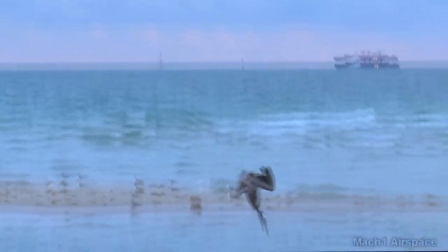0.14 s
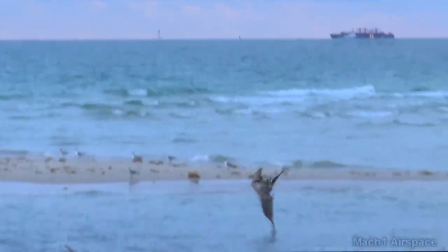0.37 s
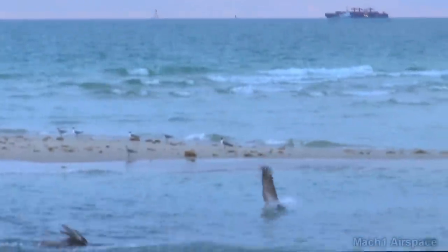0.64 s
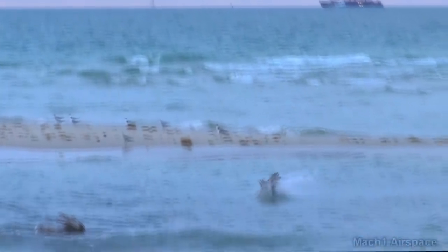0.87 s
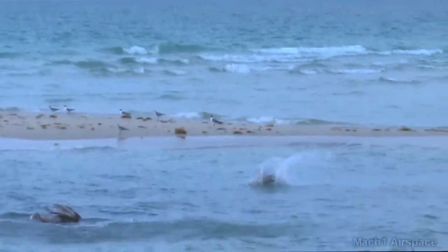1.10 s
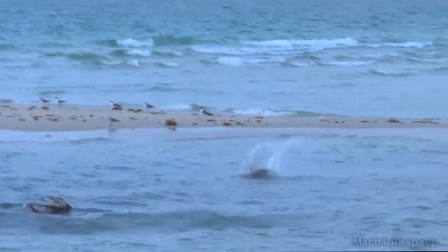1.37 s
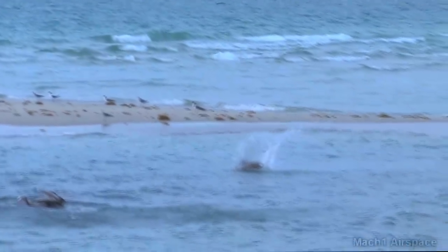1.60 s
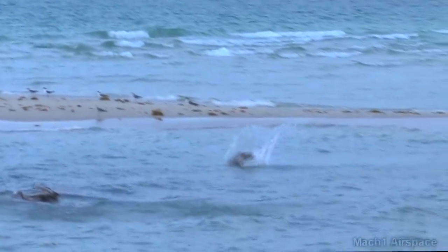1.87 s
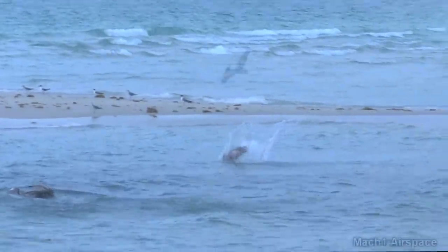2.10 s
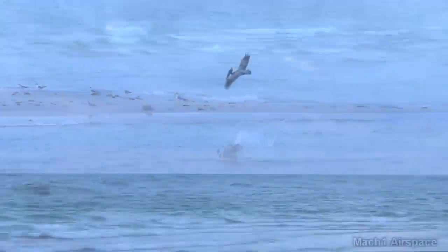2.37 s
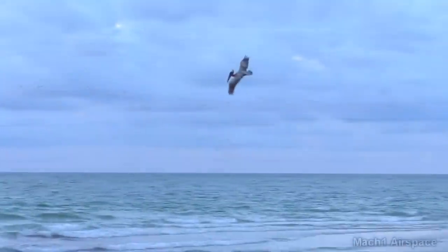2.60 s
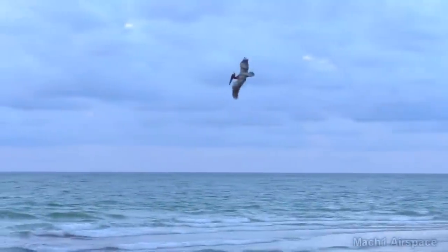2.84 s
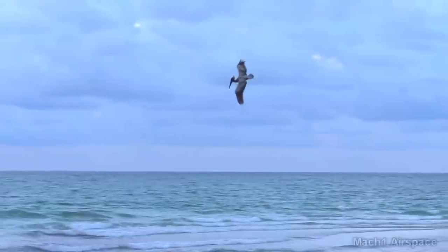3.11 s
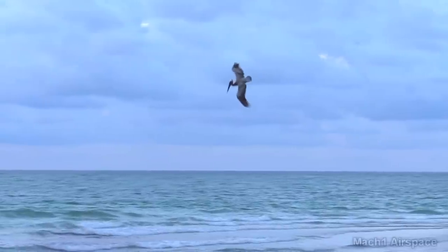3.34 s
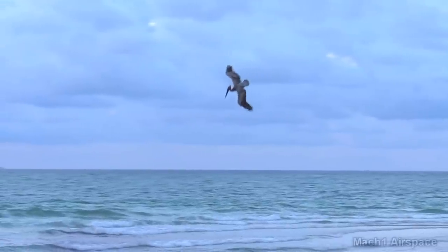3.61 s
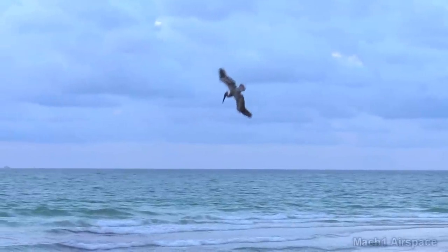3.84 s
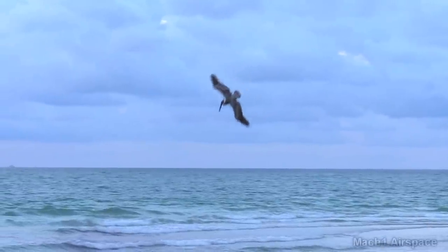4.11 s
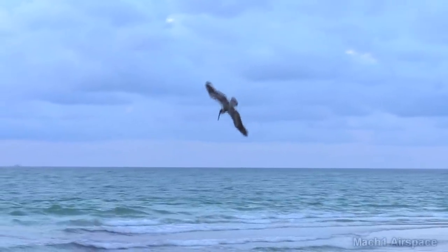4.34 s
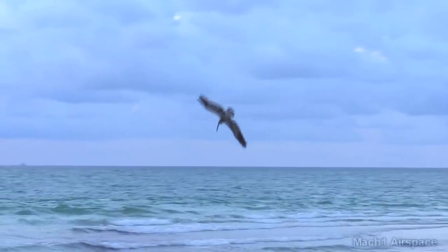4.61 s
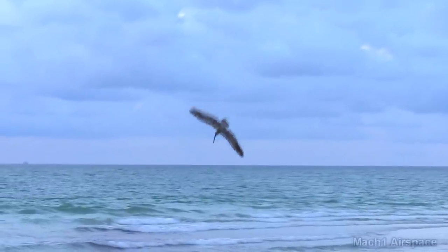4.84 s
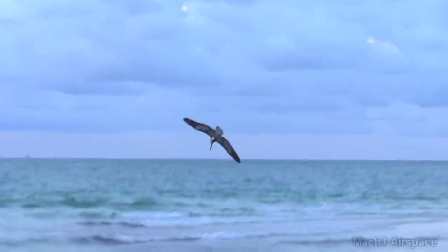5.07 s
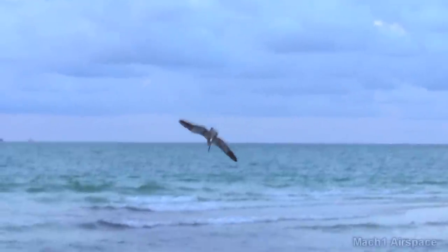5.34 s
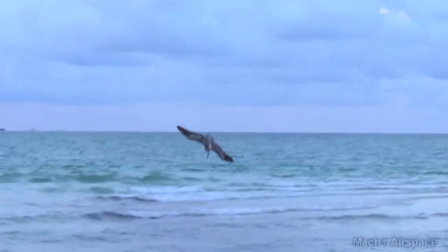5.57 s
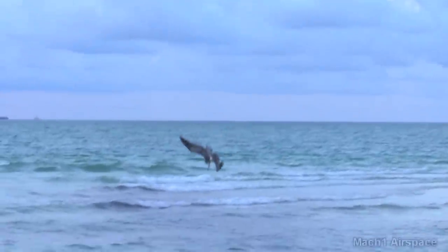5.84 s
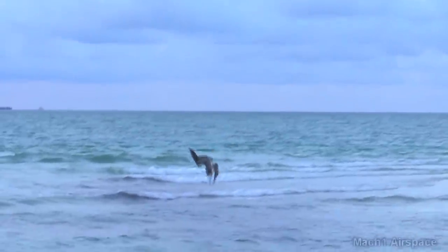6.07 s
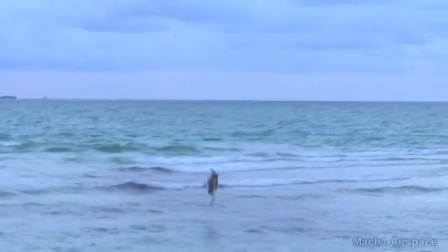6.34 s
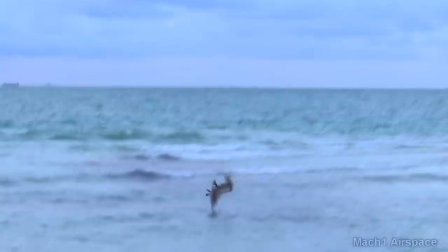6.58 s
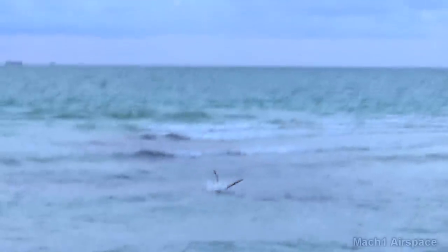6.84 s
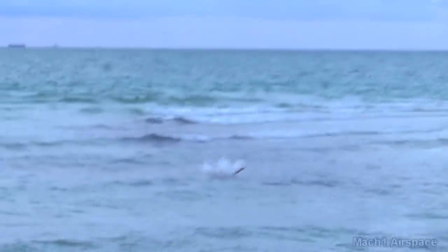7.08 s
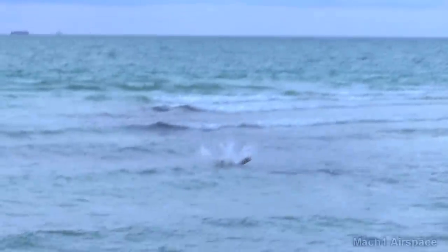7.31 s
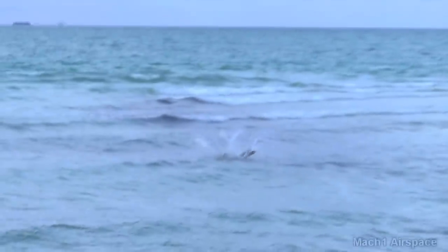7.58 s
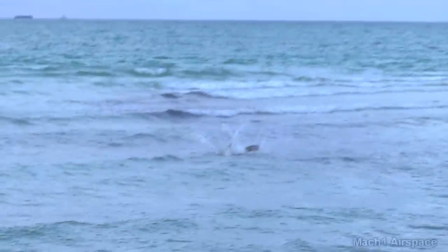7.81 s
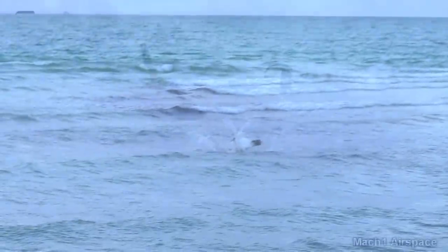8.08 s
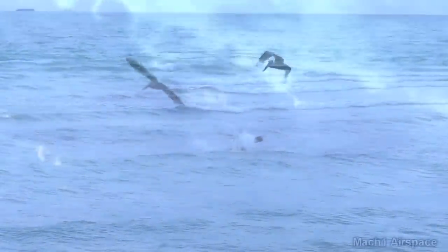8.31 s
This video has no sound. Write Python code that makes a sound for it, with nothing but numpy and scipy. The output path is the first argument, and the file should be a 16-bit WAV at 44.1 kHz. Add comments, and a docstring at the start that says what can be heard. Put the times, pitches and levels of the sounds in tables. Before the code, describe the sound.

Surf washes and hisses on a beach under buffeting microphone wind, then a gull gives seven short falling cries and a shorebird whistles thinly.

```python
"""Surf, wind and shorebirds

Surf washes onto a beach: filtered noise whose spectrum follows the swell, foam and far breakers.
Wind buffets a small stereo microphone and overloads it in the gusts: infrasonic noise and hard shoves.
Towards the end a gull gives a row of short falling cries, each a gliding stack of harmonics,
and a small shorebird a thin long whistle, a wavering near sine."""
import sys
import numpy as np
from scipy import signal
from scipy.fft import rfft, irfft
from scipy.io import wavfile
from scipy.ndimage import uniform_filter1d

SR = 44100
rng = np.random.default_rng(int(sys.argv[2]) if len(sys.argv) > 2 else 0)


def digitize_waveform(pressure):
    """Quantize a signal to 16-bit integers and store it at the path in sys.argv[1].

    Rows of a 2-D input are taken as channels; values are limited to [-1, 1].
    """
    field = np.atleast_2d(pressure).T
    bounded = np.clip(field, -1, 1)
    quanta = np.round(bounded * 32767).astype(np.int16)
    wavfile.write(sys.argv[1], SR, quanta)


def amplitude_ratio(level_db):
    """Convert a level in decibels to the matching linear amplitude (field) ratio."""
    exponent = np.asarray(level_db, float) / 20
    return 10 ** exponent


N = 372204  # samples


def evened(x):
    """Normalisation: scales to rms 1."""
    return x / np.sqrt(np.mean(x ** 2) + 1e-20)


def read(points, hz):
    """Interpolation of a spectrum table on a logarithmic frequency axis."""
    f, value = np.transpose(points)
    return np.interp(np.log(hz + 1), np.log(f + 1), value)


def add(mix, start_s, sound):
    """Superposition: adds a sound into the mix from start_s on."""
    part = mix[round(start_s * SR):][:len(sound)]
    part += sound[:len(part)]


def band_noise(low_hz, high_hz, channels=1):
    """Spectral shaping: noise with a soft lower and a steep upper edge, rms 1."""
    hz = np.fft.rfftfreq(N, 1 / SR) + 1e-6
    shape = 1 / np.sqrt((1 + (low_hz / hz) ** 4) * (1 + (hz / high_hz) ** 6))
    spectrum = rfft(rng.standard_normal((channels, N))) * shape
    return evened(irfft(spectrum, N))


def smoothed_field(field, bins, frames):
    """Correlation length: averages a random field over frequency bins and time frames, rms 1."""
    return evened(uniform_filter1d(uniform_filter1d(field, size=bins, axis=0), size=frames, axis=1))


# Relative spectral density of the surf [f/Hz, level/dB per Hz]
SURF_DENSITY = [(12, -34), (21, 2.5), (60, 1), (102, -5.5), (239, -3), (307, -13), (348, -10), (482, -16.5),
                (796, -13.5), (1130, -17), (1570, -23.5), (2020, -24), (2450, -27.5), (2950, -28.5),
                (3250, -31.5), (3870, -35), (5930, -40), (11500, -51), (13000, -60)]
# Likeness of left and right in the surf [f/Hz, likeness 0-1]
STEREO_LIKENESS = [(60, 0.96), (130, 1), (280, 0.96), (590, 0.93), (1270, 0.77), (2710, 0.44), (5820, 0.7),
                   (8500, 0.66), (12500, 0.77)]
# Tilt of the surf between the sides [f/Hz, left over right/dB]
STEREO_LEAN = [(60, 1.5), (170, 1), (510, 1.5), (1470, 1), (4290, 1), (12500, -2)]
# The set of waves builds and eases [t/s, wash level/dB]
WAVE_SET = [(0.05, -35), (1.82, -36), (2.07, -34.5), (4.16, -32), (4.33, -31.5), (5.26, -31), (7.49, -33.5),
            (7.89, -32.5), (8.4, -32)]
# Sheets of foam hissing up the sand [t at top/s, level over the lull/dB, half length/s]
FOAM_SHEETS = [(.2, 5, 0.69), (1.3, 0.5, 0.39), (2.848, 6.5, 0.21), (3.45, 2.5, .15), (3.748, 6, 0.17),
               (4.42, 6, 0.18), (4.902, 7, 0.28), (5.613, 5.5, 0.27), (6.3, 7, 0.23), (6.8, 4, .2),
               (7.25, 5, 0.26), (7.7, 4.5, 0.28), (8.2, 5.5, 0.33)]
# Far breakers falling with a boom [t/s, level over the rumble/dB, decay length/s]
FAR_BREAKERS = [(0., 2, .2), (.75, 2, 0.65), (1.95, 3.5, .2), (2.446, 4, 0.37), (2.95, 0.5, .3),
                (3.46, 4, 0.49), (4.097, 1.5, 1), (5.053, 5, 0.31), (5.5, 4, 1), (6.28, -0.5, .6),
                (7.652, 3.5, 0.21)]


def surf(patchy_db=0.6, grainy_db=1.5, flicker_db=0.5):
    """Random short-time spectra: foam brightens the noise, its level varies in time-frequency patches."""
    hop, size = 512, 2048  # samples
    frames, hz = N // hop + 5, np.fft.rfftfreq(size, 1 / SR)
    t = np.arange(frames) * hop / SR
    a, b, c, d, patches, grain = rng.standard_normal((frames, len(hz), 6)).T
    grain = smoothed_field(grain, 8, 3)  # small, brief lumps
    patches = smoothed_field(patches, 40, 8)
    flicker = evened(uniform_filter1d(rng.standard_normal(frames), size=3))

    wash_db = np.interp(t, *np.transpose(WAVE_SET))
    swell_db = wash_db - wash_db.mean()
    foam_db = -4 + 0.15 * swell_db  # lull, and share of the swell that foam follows
    for top_s, db, half_s in FOAM_SHEETS:
        foam_db = foam_db + db * np.exp(-((t - top_s) / half_s) ** 2)
    boom_db = -2 + 0.18 * swell_db  # rumble, and share of the swell that booms follow
    boom_rise_s = .04
    for fall_s, db, length_s in FAR_BREAKERS:
        rise = np.clip((t - fall_s) / boom_rise_s + 1, 0, 1)
        decay = np.exp(-(np.maximum(t - fall_s, 0) / length_s) ** 2)
        boom_db = boom_db + db * rise * decay

    # Foam weighs most in the treble, booms in the bass; the swell takes the rest
    foam_share = read([(900, 0.079), (6000, 0.54)], hz)[:, None]
    boom_share = read([(250, 0.85), (400, 0.066)], hz)[:, None]
    level_db = wash_db.mean() + (1 - foam_share - boom_share) * swell_db
    level_db = level_db + foam_share * foam_db + boom_share * boom_db
    texture_db = patchy_db * patches + flicker_db * flicker + grainy_db * grain
    level_db = level_db + (0.27 + foam_share) * texture_db

    colour = amplitude_ratio(read(SURF_DENSITY, hz))
    colour = colour / np.linalg.norm(colour[(hz > 350) & (hz < 900)])
    likeness = np.clip(read(STEREO_LIKENESS, hz), 0, 1)[:, None]
    shared = np.sqrt((1 + likeness) / 2) * (a + 1j * b)
    apart = np.sqrt((1 - likeness) / 2) * (c + 1j * d)
    lean = amplitude_ratio(read(STEREO_LEAN, hz) / 2)[:, None]
    sides = np.array([(shared + apart) * lean, (shared - apart) / lean])
    spectra = sides * colour[:, None] * amplitude_ratio(level_db)
    waves = signal.istft(spectra, nperseg=size, noverlap=size - hop)[1][:, :N]
    return waves * np.sqrt(3 / 2)  # overlap gain


# Gusts over the breeze [t at middle/s, half length/s, slow sway level/dB, faster buffeting level/dB]
WIND_GUSTS = [(0.454, 0.063, -19, -13.5), (0.84, 0.22, -4, -26), (1.483, 0.12, -12.5, -15),
              (2.29, 0.18, -13, -14), (2.808, .15, -10, -6.5), (3.3, 0.56, -13.5, -5),
              (3.856, 0.24, -17, -23), (4.694, 0.15, -12.5, -27), (5.4, .15, -27, -18),
              (6.163, .15, -12.5, -20), (7., .15, -16.5, -17.5), (7.596, 0.19, -20, -11.5),
              (8.105, 0.4, -19.5, -15)]
# Hardest shoves of air on the capsule [t/s, level/dB, push +1 or pull -1, half width/s]
AIR_SHOVES = [(2.742, -.6, 1, .026), (3.045, -1.6, -1, .015), (3.261, -1, -1, .026),
              (3.377, -2.8, -1, .025), (3.645, -3, 1, .025), (3.85, -3, -1, .015), (7.63, -2.3, 1, .02),
              (7.691, -.8, -1, .009), (7.706, -8, 1, .007), (7.72, -.8, -1, .01), (7.864, -4, 1, .02)]


def wind(left_db=1.1, apart_db=-20, ceiling=.8):
    """Turbulent pressure below hearing, nearly alike at both ports; hard shoves override the flutter."""
    t = np.arange(N) / SR
    sway_gain, buffet_gain = amplitude_ratio(-22.5), amplitude_ratio(-22)  # steady breeze
    for middle_s, half_s, sway_db, buffet_db in WIND_GUSTS:
        blowing = np.exp(-((t - middle_s) / half_s) ** 4)  # quick rise, flat top, quick fall
        sway_gain = np.maximum(sway_gain, amplitude_ratio(sway_db) * blowing)
        buffet_gain = np.maximum(buffet_gain, amplitude_ratio(buffet_db) * blowing)
    sway = sway_gain * band_noise(0.73, 4.8)
    port_noise = amplitude_ratio(apart_db) * band_noise(4.6, 25, channels=2)
    buffet = buffet_gain * (band_noise(3.8, 12.6) + port_noise)
    pressure = ceiling * np.tanh((sway + buffet) / ceiling)  # the capsule stiffens on wide swings
    for shove_s, db, sign, width_s in AIR_SHOVES:
        bump = np.exp(-((t - shove_s) / width_s) ** 2)
        pressure = pressure * (1 - bump) + sign * amplitude_ratio(db) * bump
    return pressure * amplitude_ratio([[left_db], [-left_db]])


# Gull cries [t at end/s, length/s, level before panning/dB, extra level of overtones from the fourth/dB]
GULL_CRIES = [(6.525, .065, -42, -7), (6.836, .08, -39, -5), (7.147, .092, -37.5, -4),
              (7.469, .097, -35, -3), (7.783, .093, -34, 0), (8.104, .104, -33.5, 1), (8.416, .1, -34, 0)]
# Fixed resonances of throat and beak [f/Hz, gain/dB]
BEAK_COLOUR = [(880, -4), (1000, -1), (1800, -9), (1950, -2.5), (2200, -1), (2700, -2), (3000, 0),
               (3270, -8), (3600, -13), (3800, -7), (4000, -6), (4120, -14), (4300, -26), (6000, -25)]


def cry(end_s, length_s, db, bright_db, waver=.06):
    """Source and filter: harmonics glide down through the fixed colour of throat and beak."""
    t = np.arange(0, length_s, 1 / SR)
    plateau_hz, plateau_s, lead_in_hz = 992, .05, 1095
    sag_hz_per_s, bend_hz = 1000, 95
    attack_s, release_s, husk = .03, .008, .15  # husk: random flutter in the loudness, rms share

    # Pitch lingers plateau_s before the end, falls steeper either side; the lead-in is level
    early = length_s - t - plateau_s
    hz = plateau_hz + sag_hz_per_s * early + bend_hz * (early / plateau_s) ** 3
    hz = np.minimum(hz, lead_in_hz)
    effort = np.clip(np.minimum(t / attack_s, (length_s - t) / release_s), 0, 1)
    effort = effort * (1 + husk * evened(uniform_filter1d(rng.standard_normal(len(t)), size=250)))
    wavering = waver * uniform_filter1d(rng.standard_normal(len(t)), size=200)
    turns = np.cumsum(hz * (1 + wavering)) / SR
    stack = np.zeros(len(t))
    for k in range(1, 7):
        harmonic_gain = amplitude_ratio(read(BEAK_COLOUR, k * hz) + bright_db * (k > 3))
        stack += harmonic_gain * np.cos(2 * np.pi * k * turns)
    return end_s - length_s, np.sqrt(2) * amplitude_ratio(db) * effort * stack


# Shorebird whistle, one row [t at start/s, length/s, first f/Hz, top level before panning/dB]
SHOREBIRD_WHISTLE = (7.69, .46, 4870, -51)


def whistle(waver=0.018):
    """Frequency modulation: a near sine swells in, sinks slowly and wavers in the moving air."""
    start_s, length_s, first_hz, db = SHOREBIRD_WHISTLE
    sink_hz, droop_hz, top_at = 210, 140, .58  # steady sink, late droop, share of length before the top
    u = np.arange(0, length_s, 1 / SR) / length_s
    hz = first_hz - sink_hz * u - droop_hz * u ** 4
    warp = np.log(.5) / np.log(top_at)  # moves the sine's crest to top_at
    swell = np.abs(np.sin(np.pi * u ** warp)) ** .7
    wavering = waver * uniform_filter1d(rng.standard_normal(len(u)), size=400)
    turns = np.cumsum(hz * (1 + wavering)) / SR
    return start_s, np.sqrt(2) * amplitude_ratio(db) * swell * np.sin(2 * np.pi * turns)


def scene():
    """Superposition of surf, wind and birds, the gull louder on the right and the shorebird on the left."""
    gull, shorebird = np.zeros(N), np.zeros(N)
    for row in GULL_CRIES:
        add(gull, *cry(*row))
    add(shorebird, *whistle())
    birds = gull * amplitude_ratio([[-.3], [.3]]) + shorebird * amplitude_ratio([[.4], [-.4]])
    return surf() + wind() + birds


def roll_off(x):
    """The treble ends steeply here."""
    return signal.sosfilt(signal.butter(12, 13070, fs=SR, output="sos"), x)


def record(dry):
    """Hard clipping: the strongest gusts hit full scale."""
    clipped = np.clip(dry, -1, 1)
    return roll_off(clipped)


dry = scene()
out = record(dry)
digitize_waveform(out)
```